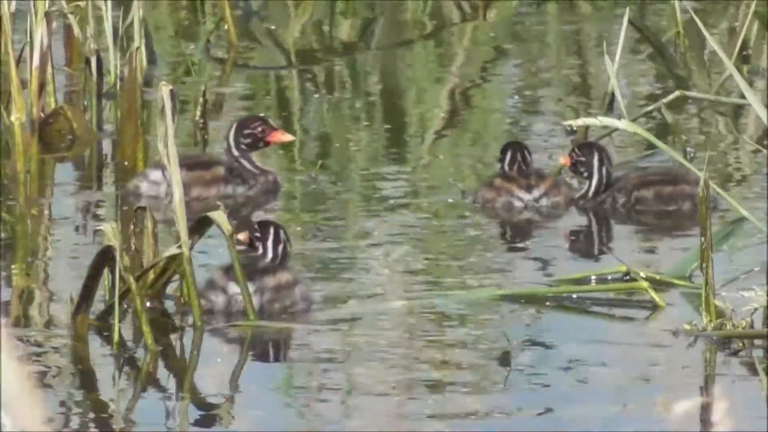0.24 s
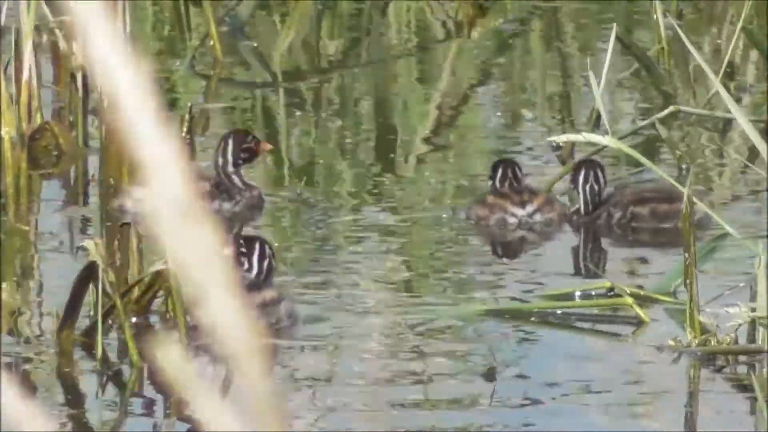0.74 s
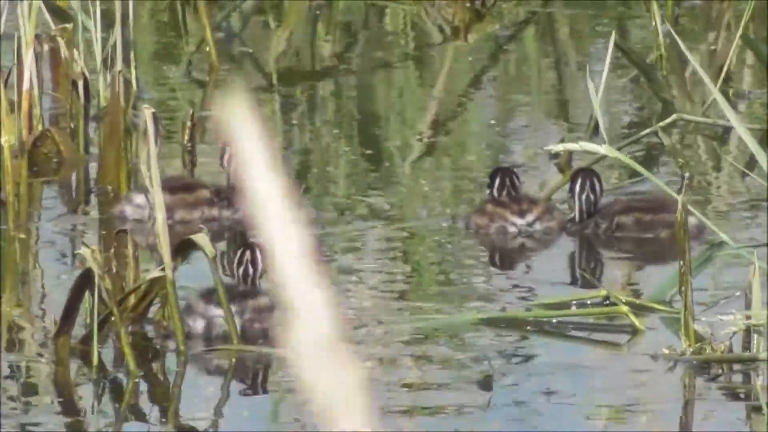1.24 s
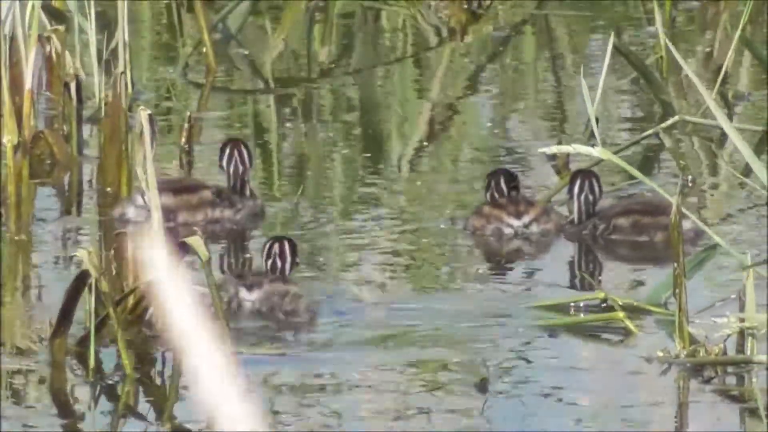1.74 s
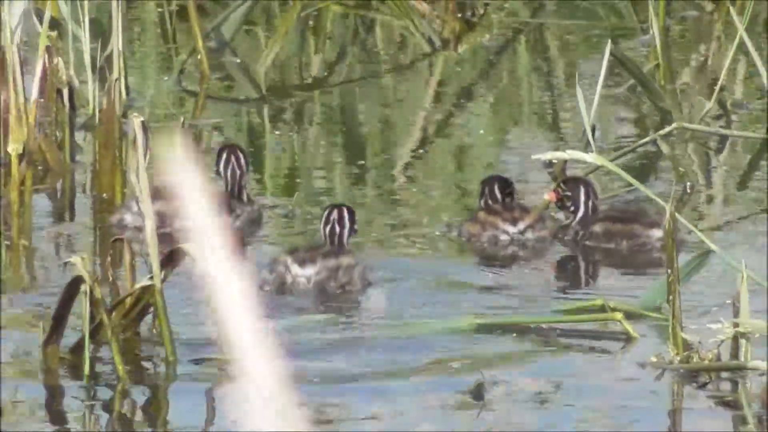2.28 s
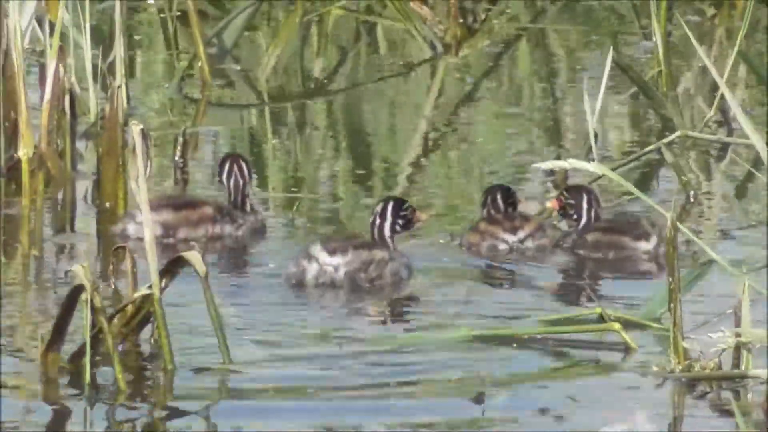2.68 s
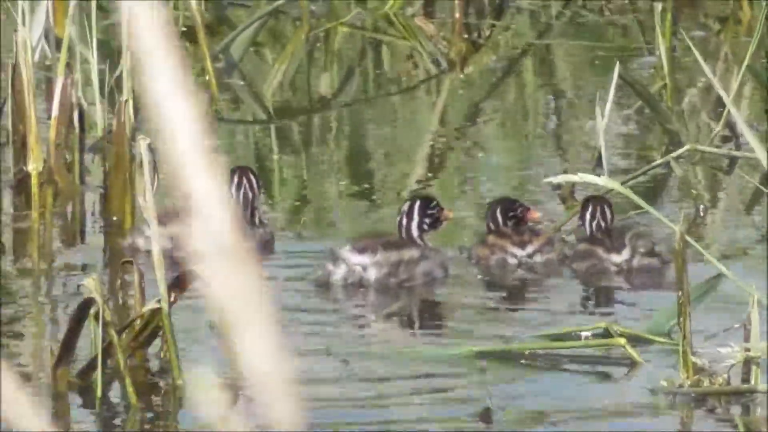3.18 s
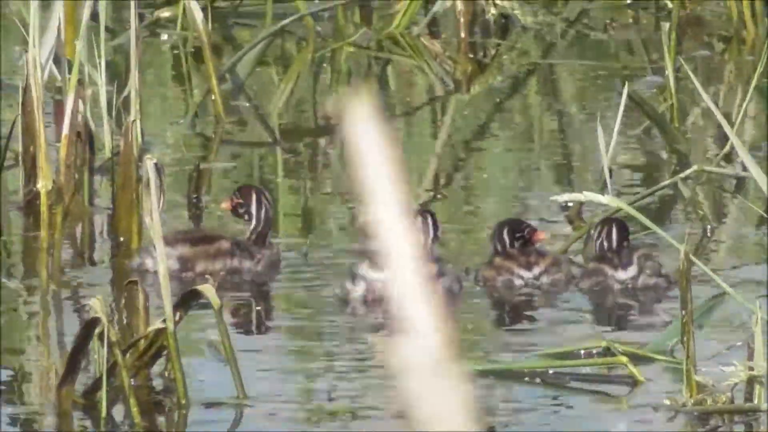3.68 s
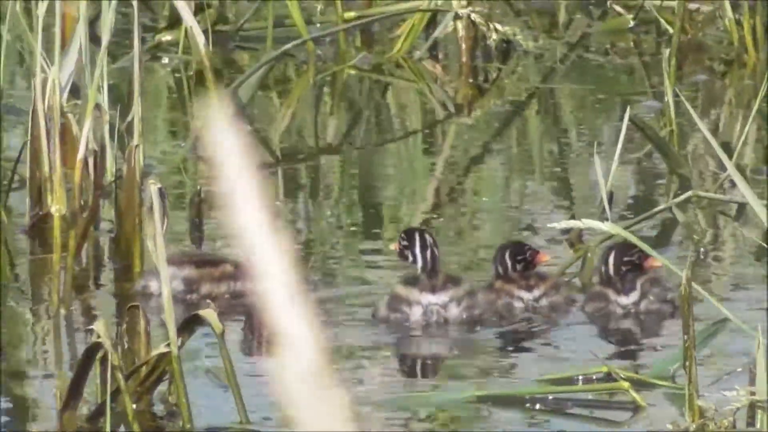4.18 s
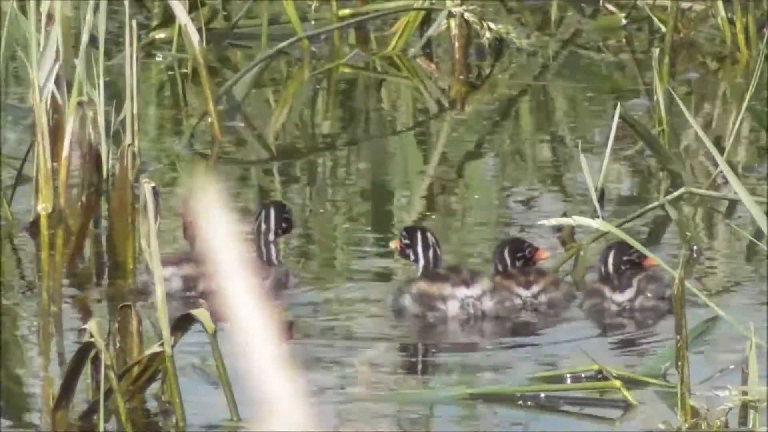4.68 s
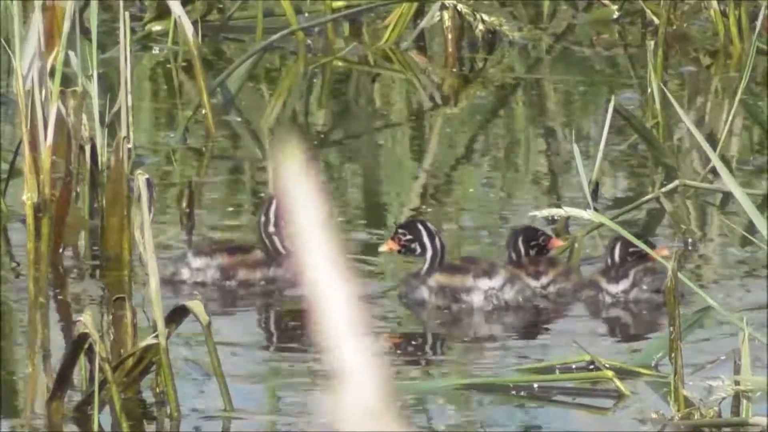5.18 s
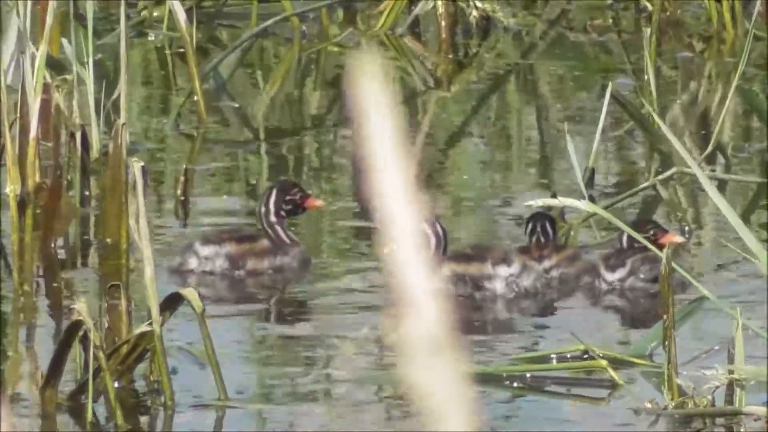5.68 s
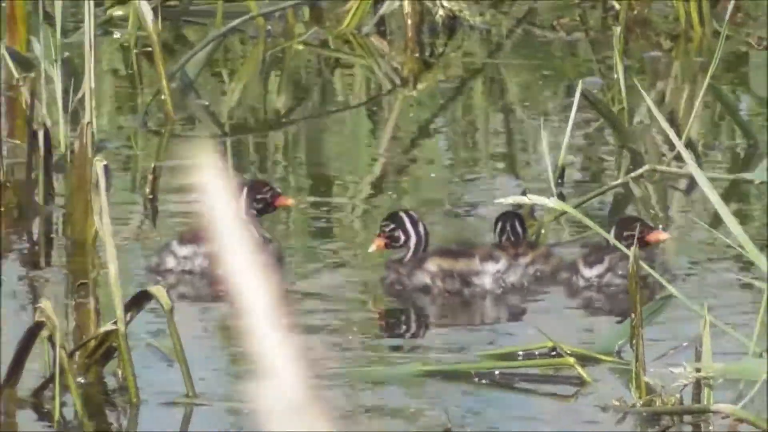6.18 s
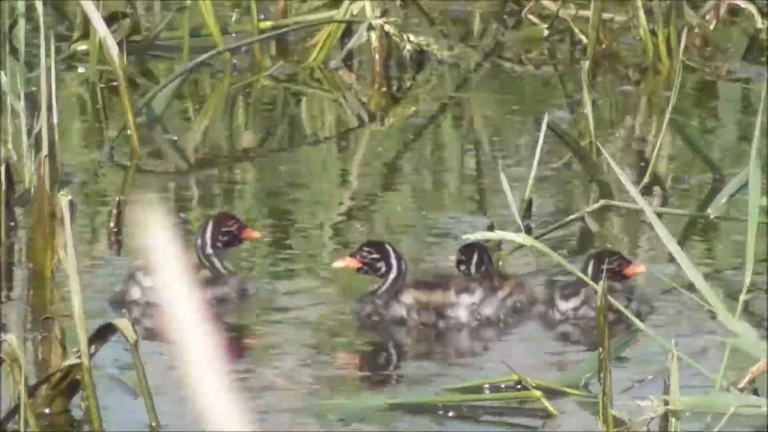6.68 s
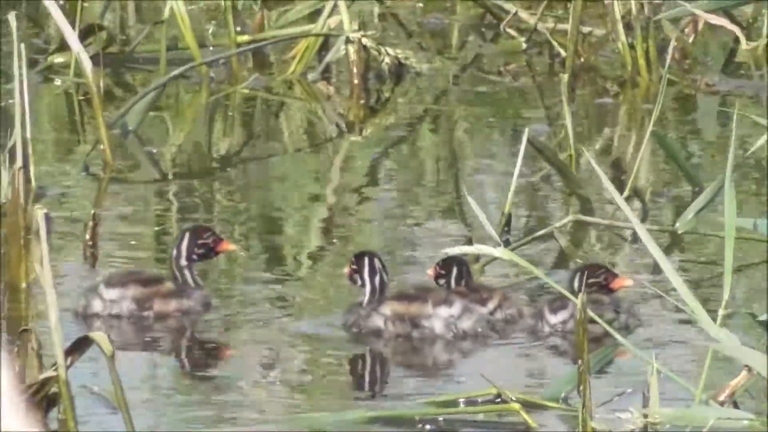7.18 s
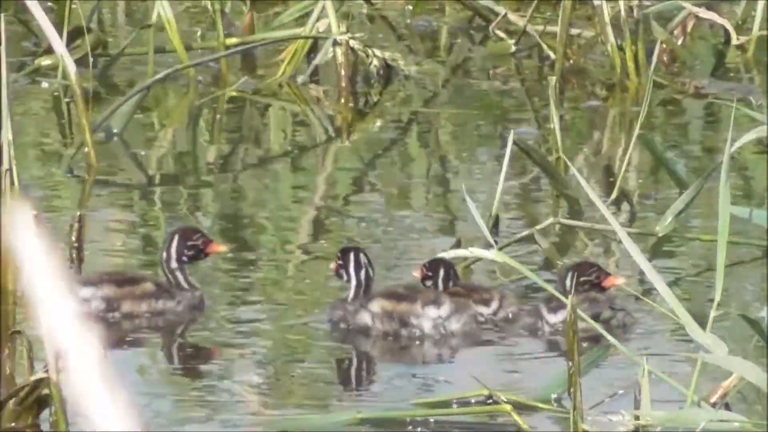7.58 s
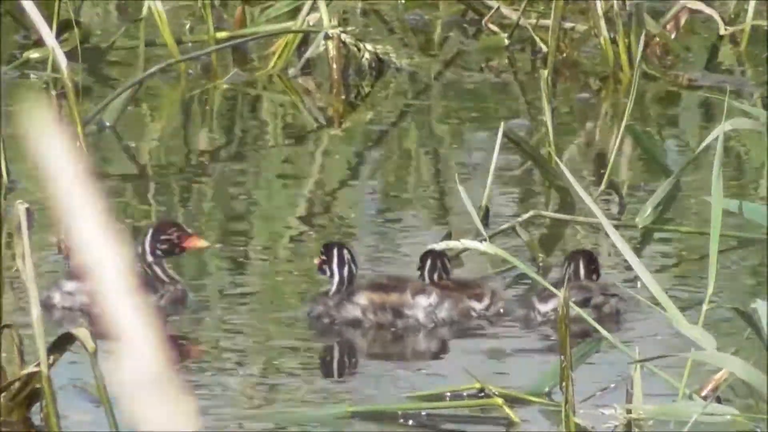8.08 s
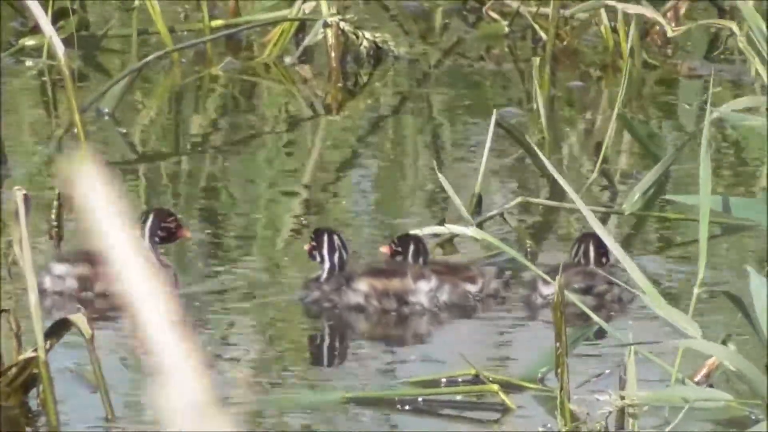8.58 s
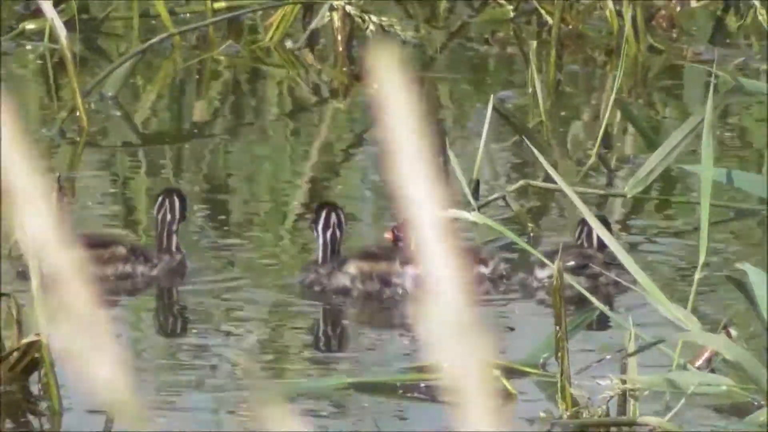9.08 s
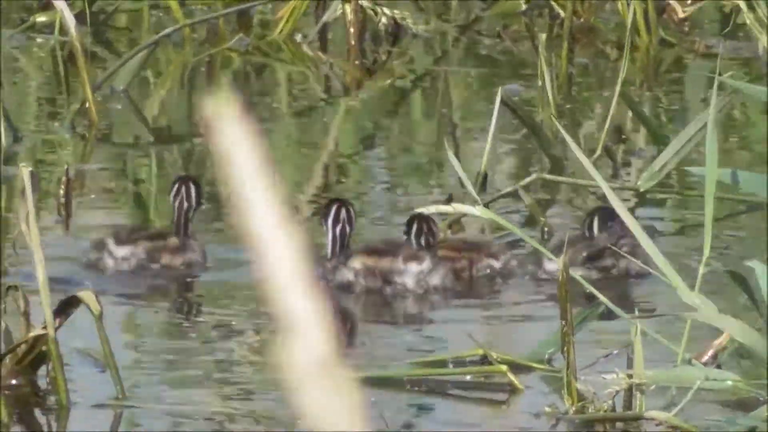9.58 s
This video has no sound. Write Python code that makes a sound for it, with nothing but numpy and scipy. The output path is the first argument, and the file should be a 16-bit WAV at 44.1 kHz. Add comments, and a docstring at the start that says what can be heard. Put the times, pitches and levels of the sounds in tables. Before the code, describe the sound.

A steady, distant machine hum and low rumble lie under a soft hiss of reeds and water throughout. A tiny splash flicks at 0.65 seconds, then faint squeaks lead into a grebe chick's trill at about 1.2. From 1.5 to 4.1 it runs high and fast, about seventeen scooping syllables a second, in swelling and fading bouts with small chirps; a sharper one comes near 2.9. The trilling stops until about 5, with little water flicks and a thin raspy squeal swooping at 4.8. A second long trill runs from 5 to 6.7, weakens around 7, then returns rougher and more uneven, with another chick's hoarse notes joining from 7.5 to 8.5. Raspy chirps cluster near 8.1 and 8.7. Trilling continues, softening to 9.8. The brood sits slightly right, with a short diffuse tail; wind softly thumps the microphone near 2.8, 8.1 and 9.3.

```python
"""Grebe chicks trill among river reeds: each harmonic syllable scoops up in pitch, about 17 a second, with a
softer arched note in each short gap. The brood, a little right of the microphone, adds a swooping squeal, hoarse
or thin chirps made as unsteady whistles, and small splashes of grainy noise. A distant machine, perhaps a pump,
hums as steady and wavering sine lines over a noise bed of low rumble and hiss; filtered noise puffs of wind
touch the microphone, and the reeds scatter a short diffuse tail of the brood."""
import sys
import numpy as np
from scipy import signal
from scipy.fft import rfft, irfft, next_fast_len
from scipy.io import wavfile
from scipy.ndimage import uniform_filter1d, map_coordinates

SR = 44100
rng = np.random.default_rng(int(sys.argv[2]) if len(sys.argv) > 2 else 0)


def persist_wave(psi):
    """Save psi, clipped to +-1, as 16-bit WAV."""
    counts = np.round(np.clip(psi, -1, 1) * 32767).astype(np.int16)
    wavfile.write(sys.argv[1], SR, np.atleast_2d(counts).T)


N = 433944

# overtone of a thin whistle: (overtone frequency [Hz], basic level relative to the whistle [dB])
OVERTONE_LEVEL = [(7000, -27), (8500, -25), (9500, -3), (11500, -22)]


def amp(db):
    """Decibels to gain."""
    return 10 ** (np.asarray(db) / 20)


def unit(x):
    """Scale to rms 1."""
    return x / np.sqrt(np.mean(x ** 2) + 1e-20)


def along(points, hz):
    """Read (frequency [Hz], value) points on a log frequency axis."""
    f, v = np.transpose(points)
    return np.interp(np.log(hz + 1), np.log(f + 1), v)


def at(rows, s):
    """Read every column of a curve at the times s [s]."""
    times, *columns = np.transpose(rows)
    return [np.interp(s, times, column) for column in columns]


def wobble(rate, size=N):
    """A smooth random curve through `rate` random knots a second."""
    knots = rng.standard_normal(int(size * rate / SR) + 4)
    fine = 16  # spline points per knot, joined by straight lines
    steps = np.arange((len(knots) - 1) * fine) / fine
    curve = map_coordinates(knots, [steps])
    return np.interp(np.arange(size) * rate / SR, steps, curve)


def filtered(x, response):
    """Multiply the spectrum of x by a response of frequency [Hz]."""
    m = next_fast_len(N + 8192)
    return irfft(rfft(x, m) * response(np.fft.rfftfreq(m, 1 / SR)), m)[..., :N]


def add(track, s, sound):
    """Mix a sound into the track, starting at s seconds."""
    part = track[max(round(s * SR), 0):][:len(sound)]
    part += sound[:len(part)]


def panned(x, left_db):
    """Place a sound between left and right by their level difference."""
    return x * amp([[left_db / 2], [-left_db / 2]])


def arch(length):
    """Position -.5 to .5 through a note of `length` seconds, and its rounded swell."""
    u = np.linspace(-.5, .5, max(int(length * SR), 16))
    return u, np.abs(np.cos(np.pi * u)) ** 0.34


def swells(rows):
    """A gain curve of rounded swells: (centre [s], level [dB], length [s])."""
    flow = np.zeros(N)
    for s, db, length in rows:
        add(flow, s - length / 2, amp(db) * arch(length)[1])
    return flow


def syrinx(pitch, harmonics, jitter=0.0088):
    """The voice organ: a slightly unsteady whistle with (multiple, rms level [dB]) harmonics."""
    unsteady = pitch * (1 + jitter * wobble(670, size=len(pitch)))
    phase = 2 * np.pi * np.cumsum(unsteady) / SR
    return np.sqrt(2) * sum(amp(db) * np.sin(k * phase) for k, db in harmonics)


def syllables():
    """One row per syllable, (time [s], manner of its trill): each trill keeps an almost even beat."""
    # trills: (first syllable [s], last syllable [s], syllables, slowing [share], syllable length at full voice [s],
    #          mean upward sweep and opening scoop of the second harmonic [Hz], pitch roughness [share],
    #          fundamental and basic third harmonic relative to the syllable's level [dB])
    trill_rows = [(1.174, 1.486, 6, -0.0013, .018, 80, 60, .005, -29, -29),
                  (1.545, 2.223, 12, 0.0029, 0.026, 440, 595, .005, -13, -16),
                  (2.292, 2.654, 7, -0.0039, 0.027, 80, 200, .006, -9.5, -20),
                  (2.716, 4.092, 24, -0.0087, 0.027, 140, 450, 0.0059, -12.5, -23),
                  (4.976, 5.223, 5, 0, 0.029, 30, 100, .006, -25, -18),
                  (5.276, 5.62, 7, -0.034, .026, 400, 200, .008, -29, -11),
                  (5.675, 6.689, 19, .016, .025, 191, 180, 0.0044, -21, -11),
                  (6.751, 7.089, 7, 0, 0.023, 200, 150, .012, -15, -5),
                  (7.152, 7.443, 6, -0.035, 0.027, 380, 250, .011, -18, -12.5),
                  (7.502, 8.437, 16, 0.012, .026, 250, 300, 0.024, -18, -10.5),
                  (8.497, 8.734, 5, -.02, 0.031, 400, 200, 0.017, -10.5, -21),
                  (8.792, 9.804, 18, .012, .024, 290, 200, 0.0084, -12, -23)]
    rows = []
    for first, last, count, slowing, *manner in trill_rows:
        u = np.linspace(0, 1, round(count))
        beats = first + (last - first) * (u - slowing * u * (1 - u))
        rows += [(s, *manner) for s in beats]
    return np.array(rows)


def rush(spectrum):
    """Diffuse stereo noise of rms 1, its left-right likeness and balance set by frequency."""
    # how alike the two sides are: (frequency [Hz], correlation)
    likeness = [(60, 0.8), (110, 0.86), (200, 0.87), (380, 0.8), (700, 0.82), (1290, 0.84), (2380, 0.75),
                (4400, 1), (8120, -0.08), (15000, 0.06)]
    # balance of the sides: (frequency [Hz], left minus right [dB])
    balance = [(60, 0), (110, -0.5), (200, 0), (380, 2), (700, -3), (1290, -1.5), (2380, -1), (4400, -4.5),
               (8120, -0.5), (15000, 3)]

    def mid_side(hz):
        turn = np.arccos(np.clip(along(likeness, hz), -1, 1)) / 2
        return amp(along(spectrum, hz)) * [np.cos(turn), np.sin(turn)]

    mid, side = filtered(rng.standard_normal((2, N)), mid_side)
    sides = np.array([mid + side, mid - side])
    return unit(filtered(sides, lambda hz: amp(np.outer([.5, -.5], along(balance, hz)))))


def background(rumble_db=-26.5, air_db=-41):
    """Far rumble under the even hiss of reeds and water, each a gently wavering noise."""
    # far rumble: (frequency [Hz], relative density [dB per Hz])
    rumble_spectrum = [(12, -9.5), (21, 2.5), (42, -9), (68, -7), (110, -9), (170, -7), (225, -5.5),
                       (300, -7.5), (370, -11), (560, -12.5), (720, -14.5), (1190, -21.5), (1420, -27.5),
                       (2500, -47)]
    # hiss of reeds and water: (frequency [Hz], relative density [dB per Hz])
    air_spectrum = [(900, -56), (1400, -5.5), (1750, 1.75), (2300, -2), (3200, -2.5), (4200, -7),
                    (5000, -16), (6300, -23.5), (7400, -15), (9000, -14), (12000, -19.5), (16000, -35)]
    rumble = amp(rumble_db + 0.14 * wobble(2.86)) * rush(rumble_spectrum)
    air = amp(air_db + 0.87 * wobble(1.97)) * rush(air_spectrum)
    return rumble + air


def machine(waver_db=3.0):
    """Distant shaft orders and a whine; the less steady a line's phase, the more its level wavers too."""
    # machine lines: (frequency [Hz], mean rms level [dB], phase unsteadiness [rad])
    hum_lines = [(29.6, -30.5, .06), (60, -37, 0.13), (91, -39.5, 0.18), (120, -48, 0.33),
                 (151, -44.5, 0.47), (181.4, -43, 0.68), (211, -39.5, 0.52), (240.3, -45.5, 0.61),
                 (271, -47.5, 0.87), (387, -37, 0.16), (408, -47, 0.6), (510.3, -51.5, 0.94),
                 (769.6, -50.5, 0.33), (1062, -52.5, 0.8), (1164, -54, 0.42)]
    t = np.arange(N) / SR
    lines = np.zeros(N)
    for hz, db, drift in hum_lines:
        level = amp(db + waver_db * drift * wobble(3.6))
        phase = 2 * np.pi * (hz * t + rng.random()) + drift * wobble(4)
        lines += level * np.sin(phase)
    return panned(np.sqrt(2) * lines, left_db=2.5)


def splashes(grain_db=5):
    """Paddling chicks flick water: short grainy bursts of filtered noise as spray."""
    # small splashes: (centre [s], level [dB], length [s])
    splash_times = [(.65, -39.5, 0.042), (1.02, -49, .04), (2.41, -41, 0.066), (2.81, -43, .06),
                    (3.65, -42, .03), (4.168, -42, .04), (4.48, -47, .03), (4.84, -44, 0.1),
                    (5.18, -43, 0.09), (5.79, -43, 0.095), (7.5, -44, .04), (7.793, -40, .06),
                    (8.38, -42, 0.04), (8.71, -42, .05), (8.82, -44, 0.045)]
    # colour of the spray: (frequency [Hz], relative density [dB per Hz])
    spray_spectrum = [(1200, -39), (2500, 1), (4000, 8.5), (6000, -3.5), (9000, -8), (15000, -22)]
    spray = rng.standard_normal(N) * amp(grain_db * np.tanh(wobble(600)))
    spray = unit(filtered(spray, lambda hz: amp(along(spray_spectrum, hz))))
    return swells(splash_times) * spray


def chirps(bend_hz=700, overtone_db=-4):
    """Short arched whistles with an overtone; the hoarse ones shake quickly in pitch."""
    # thin squeaks to hoarse rasps: (centre [s], pitch [Hz], level [dB], sweep [Hz], length [s],
    #                                pitch roughness [share])
    chirp_rows = [(1.025, 4100, -45, -200, .04, .03), (1.069, 2050, -41, -400, .03, .03),
                  (1.108, 2360, -37, -200, .018, .03), (1.109, 4650, -46, -300, .016, .02),
                  (1.226, 3050, -37, 1100, 0.013, .02), (1.297, 10500, -41, 350, .018, .006),
                  (1.361, 10700, -45, -200, .02, .006), (2.835, 4800, -43, -300, 0.034, 0.024),
                  (2.879, 4100, -30, -1800, 0.053, 0.02), (3.155, 5000, -38, -1800, 0.05, .025),
                  (4.498, 3730, -37.5, 100, .04, .03), (4.497, 4380, -44, -150, .035, .02),
                  (5.045, 5200, -44, 60, .032, .01), (5.176, 4500, -36, -300, .04, .05),
                  (5.2, 3340, -30, -700, 0.037, .04), (5.208, 4150, -37, -200, .03, .06),
                  (5.286, 5750, -41, -800, 0.032, .03), (6.785, 3420, -41, 150, .028, .02),
                  (6.805, 4550, -42, -200, 0.066, .03), (6.865, 3220, -39, 95, .03, .02),
                  (6.936, 3550, -34.5, 700, 0.036, .025), (6.96, 4500, -45, 100, .08, .04),
                  (7.015, 3300, -41, 400, .033, .025), (7.497, 3280, -38, -500, .022, .07),
                  (7.806, 3750, -31, 0, .022, .06), (7.807, 4750, -41, 0, 0.018, .03),
                  (8.064, 2920, -34, 499, 0.022, .04), (8.12, 3550, -29.5, 600, 0.024, 0.044),
                  (8.183, 3540, -36, 400, .023, 0.048), (8.5, 2500, -38, -200, 0.028, .03),
                  (8.557, 2600, -36, -200, 0.031, .02), (8.636, 2550, -38, -100, 0.029, .02),
                  (8.7, 2680, -34, 250, 0.025, .02), (8.728, 3400, -29.5, 500, 0.038, 0.052),
                  (8.736, 1860, -38, 100, .022, .02), (8.826, 2610, -37, 100, .024, .03),
                  (8.814, 3400, -35, -200, 0.024, .05)]
    out = np.zeros(N)
    for s, hz, db, sweep, length, rough in chirp_rows:
        u, swell = arch(length)
        pitch = hz + sweep * u - bend_hz * u ** 2
        second_db = overtone_db + along(OVERTONE_LEVEL, 2 * pitch)
        add(out, s - length / 2, amp(db) * swell * syrinx(pitch, [(1, 0), (2, second_db)], rough))
    return out


def trills(gain_db=-2, beak_hz=5000, fifth_db=-20):
    """Each syllable scoops steeply up in pitch and levels off; the throat favours the second harmonic."""
    # course of each bout: (time [s], mean pitch of the second harmonic [Hz], level before gain_db [dB])
    first_bout = [(1.176, 2520, -30), (1.36, 2660, -23.5), (1.485, 2650, -25.5), (1.545, 3560, -30),
                  (1.62, 3570, -40), (1.76, 3680, -27.5), (1.9, 3500, -38), (2.13, 3535, -22.5),
                  (2.29, 3530, -39), (2.42, 3520, -30), (2.62, 3430, -40.5), (2.76, 3490, -22.5),
                  (2.92, 3370, -35), (3.08, 3350, -31.5), (3.27, 3310, -31.5), (3.41, 3340, -39),
                  (3.57, 3310, -27.5), (3.75, 3340, -33.5), (3.92, 3250, -27.5), (4.092, 3140, -34.5)]
    second_bout = [(4.976, 2270, -36.5), (5.07, 2740, -41.5), (5.222, 2800, -30), (5.276, 3200, -27.5),
                   (5.58, 3207, -23.5), (5.8, 3120, -24.5), (6.06, 3150, -22), (6.24, 3104, -26),
                   (6.41, 3090, -27.5), (6.58, 2980, -30), (6.689, 2710, -37.5)]
    third_bout = [(6.75, 2890, -43.5), (7.09, 2700, -42), (7.152, 2640, -34.5), (7.28, 2990, -26),
                  (7.443, 2990, -28), (7.503, 2500, -32), (7.565, 2910, -30.5), (7.69, 3000, -32.5),
                  (7.812, 2460, -33.5), (7.873, 2900, -27), (7.995, 2986, -25), (8.14, 2370, -33),
                  (8.195, 2380, -33.5), (8.255, 2720, -30), (8.38, 2890, -31), (8.436, 2780, -32.5),
                  (8.497, 3500, -29), (8.556, 3520, -36), (8.65, 3440, -27), (8.8, 3320, -27),
                  (8.97, 3310, -25), (9.15, 3240, -26.5), (9.48, 3080, -35), (9.805, 3230, -34.5)]
    course = first_bout + second_bout + third_bout
    vary_db, detune, vary_sweep, vary_length = 0.8, 0.0039, 0.24, .07  # the last three are shares
    full_voice_db, shorten_per_db = -25, .012  # a softer syllable is shorter by this share per dB
    out = np.zeros(N)
    rows = syllables()
    draws = rng.standard_normal((len(rows), 4))
    for row, (force, tune, glide, hold) in zip(rows, draws):
        s, length, sweep, scoop, rough, first_db, third_db = row
        hz, db = at(course, s)
        hz *= 1 + detune * tune
        sweep *= 1 + vary_sweep * glide
        length *= 1 + vary_length * hold + shorten_per_db * (db - full_voice_db)
        u = arch(length)[0]
        swell = signal.windows.tukey(len(u), 0.58) ** 0.5
        onset = np.exp(-(u + .5) / 0.12)  # the voice starts flat and is pulled up to pitch
        second_hz = hz + sweep * u - abs(sweep) * u ** 2 - scoop * (onset - np.median(onset))
        # little passes above the beak's resonance
        third_db -= 10 * np.log10(1 + (1.5 * hz / beak_hz) ** 20)
        harmonics = [(1, first_db), (2, 1), (3, third_db), (4, -37), (5, third_db + fifth_db)]
        note = syrinx(second_hz / 2, harmonics, rough)
        add(out, s - length / 2, amp(db + gain_db + vary_db * force) * swell * note)
    return out


def chatter(level_db=-46, centre_hz=3783, spread=.14, scatter=0.026, length=0.025):
    """Siblings slip faint arched whistles in around each syllable, `scatter` [s] off it, at random pitches."""
    out = np.zeros(N)
    u, swell = arch(length)
    times = syllables()[:, 0]
    draws = rng.standard_normal((len(times), 4))
    for s, (when, tune, force, glide) in zip(times, draws):
        middle_hz = centre_hz * np.exp(spread * min(tune, 1.5))
        pitch = middle_hz * (1 + 0.125 * glide * u - 0.337 * u ** 2)
        chirp = swell * syrinx(pitch, [(1, 0)], jitter=0.021)
        add(out, s + scatter * when, amp(level_db + 2.4 * force) * chirp)
    return out


def wind():
    """Light puffs of low noise buffet each microphone port on its own."""
    # puffs at the microphone: (centre [s], level [dB], length [s])
    puff_times = [(1.3, -34, 0.23), (2.45, -30, 0.12), (2.76, -25.5, .22), (6.96, -32, 0.14),
                  (8.085, -18, 0.095), (8.21, -24.5, 0.19), (9.17, -27.5, .08), (9.47, -26, 0.073)]
    # colour of the buffeting: (frequency [Hz], relative density [dB per Hz])
    buffet_spectrum = [(12, -9), (30, -0.5), (70, -1.5), (130, -11), (220, -12.5), (400, -23), (900, -70)]
    noise = rng.standard_normal((2, N))
    return swells(puff_times) * unit(filtered(noise, lambda hz: amp(along(buffet_spectrum, hz))))


def between_notes(length=.028, droop=0.422, gain_db=-5.0):
    """A lower arched note with upper harmonics only fills each short gap, also from trill to trill."""
    # soft notes: (time [s], mean pitch [Hz], second, third and fourth harmonic before gain_db [dB])
    note_course = [(1.2, 1160, -55, -34, -43), (1.65, 1200, -58, -49, -53), (3.0, 1320, -45, -38.5, -48),
                   (3.6, 1264, -58, -51, -60), (5.15, 1270, -43, -46, -58), (5.4, 1312, -37, -35.5, -53),
                   (6.05, 1216, -33, -44, -34), (6.5, 1177, -37, -41, -52), (7.4, 1086, -42.5, -37, -43),
                   (8.6, 1148, -40.5, -38.5, -44), (9.1, 1200, -43, -37, -45), (9.8, 1125, -55, -45, -44)]
    out = np.zeros(N)
    times = syllables()[:, 0]
    middles = (times[1:] + times[:-1]) / 2
    gaps = middles[np.diff(times) < .1]  # only the long pause stays empty
    u, swell = arch(length)
    for s, (tune, force) in zip(gaps, rng.standard_normal((len(gaps), 2))):
        hz, *levels = at(note_course, s)
        pitch = hz * (1 + 0.0082 * tune) * (1 - droop * u ** 2)
        note = swell * syrinx(pitch, enumerate(levels, 2))
        add(out, s - length / 2, amp(gain_db + 2.0 * force) * note)
    return out


def squeal(gain_db=0.5):
    """One thin, slightly raspy whistle whose pitch swoops up and down."""
    # course of the squeal: (time [s], pitch before smoothing [Hz], level before gain_db [dB])
    swoop = [(4.757, 3800, -46), (4.771, 5700, -33.5), (4.783, 6300, -39), (4.794, 4200, -33),
             (4.803, 3420, -36), (4.814, 4500, -27.5), (4.826, 3350, -37), (4.836, 4000, -24),
             (4.854, 4540, -31), (4.864, 3270, -29), (4.872, 3420, -33), (4.883, 3000, -42)]
    out = np.zeros(N)
    t = np.arange(swoop[0][0], swoop[-1][0], 1 / SR)
    hz, db = at(swoop, t)
    harmonics = [(1, 0), (2, along(OVERTONE_LEVEL, 2 * hz))]
    whistle = syrinx(uniform_filter1d(hz, size=160), harmonics, jitter=0.033)
    add(out, t[0], amp(db + gain_db) * signal.windows.tukey(len(t), .2) * whistle)
    return out


def duet(level_db=-39, third_hz=3450, sweep_hz=900, bend_hz=1500, rough=0.054, length=0.016, lead=.003):
    """A second chick's hoarse arched notes, strongest in the third harmonic, almost on the other's beat."""
    # span of the joining in: (from [s], to [s])
    span = (7.48, 8.46)
    out = np.zeros(N)
    times = syllables()[:, 0]
    times = times[(times > span[0]) & (times < span[1])]
    u, swell = arch(length)
    for s, (tune, force) in zip(times, rng.standard_normal((len(times), 2))):
        pitch = (third_hz * (1 + 0.028 * tune) + sweep_hz * u - bend_hz * u ** 2) / 3
        note = swell * syrinx(pitch, [(2, -8), (3, -1), (4, -10)], rough)
        add(out, s - lead - length / 2, amp(level_db + 1.3 * force) * note)
    return out


def reeds(x, t60=0.38):
    """The stems scatter a short diffuse tail to each side, decaying by 60 dB in t60 seconds."""
    t = np.arange(SR // 2) / SR
    tail = rng.standard_normal((2, len(t))) * amp(-60 * t / t60) * (1 - np.exp(-t / 0.0092))
    return signal.fftconvolve(x[None], tail / np.linalg.norm(tail[0]), axes=1)[:, :N]


def scene(scatter_db=-16, lag_samples=1.54):
    """The brood is a little to the right, so it reaches the left later and softer; rumble is all around."""
    brood = trills() + duet() + between_notes() + chirps() + chatter() + squeal() + splashes()

    def lag(hz):  # half the delay on the left, half the advance on the right
        return np.exp(np.outer([-1, 1], 1j * np.pi * hz * lag_samples / SR))

    direct = filtered(panned(brood, left_db=-4.0), lag)
    return direct + amp(scatter_db) * reeds(brood) + machine() + background() + wind()


def record(dry, top_hz=15850):
    """The camera keeps nothing above its band limit."""
    return filtered(dry, lambda hz: hz < top_hz)


dry = scene()
out = record(dry)
persist_wave(out)
```